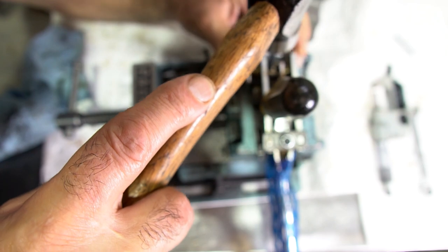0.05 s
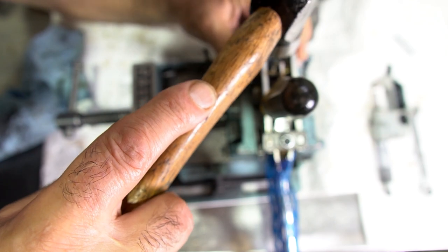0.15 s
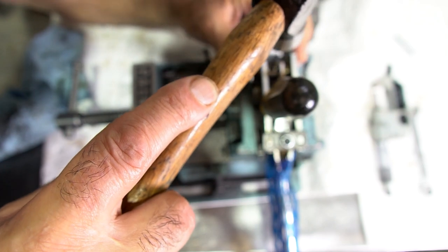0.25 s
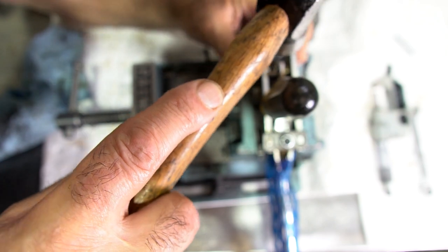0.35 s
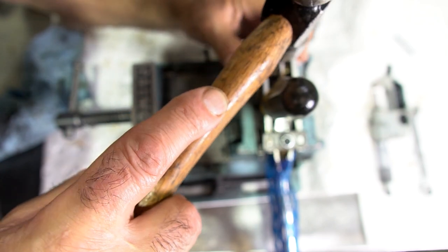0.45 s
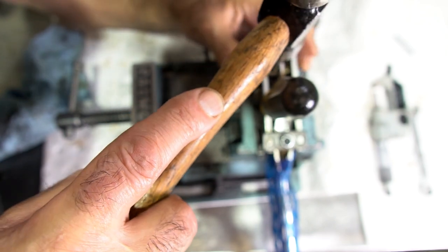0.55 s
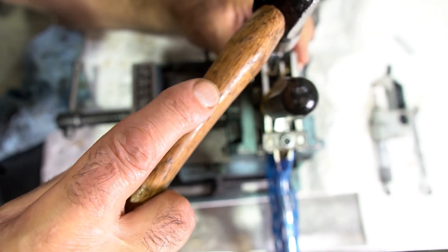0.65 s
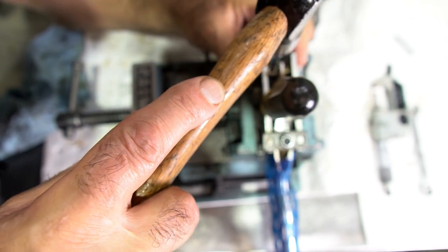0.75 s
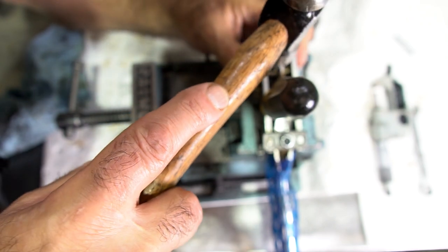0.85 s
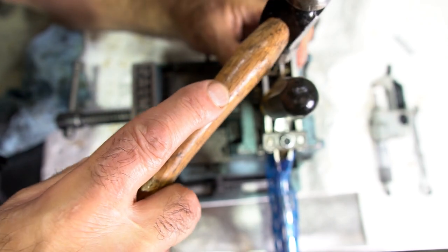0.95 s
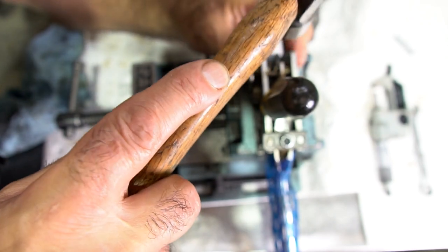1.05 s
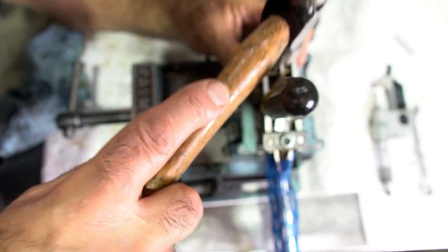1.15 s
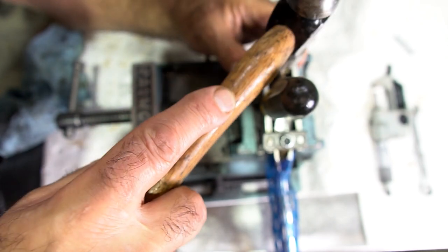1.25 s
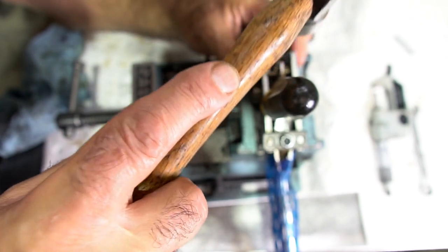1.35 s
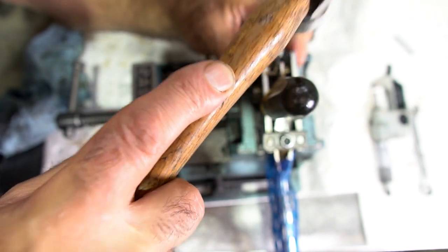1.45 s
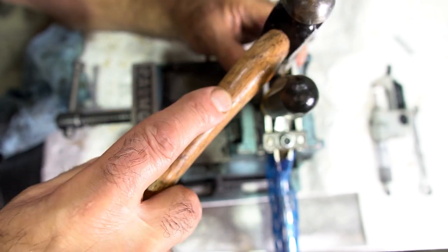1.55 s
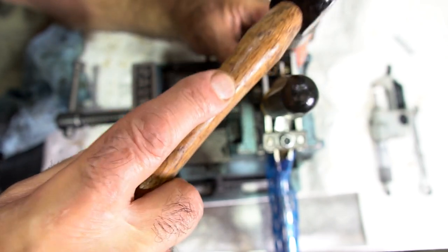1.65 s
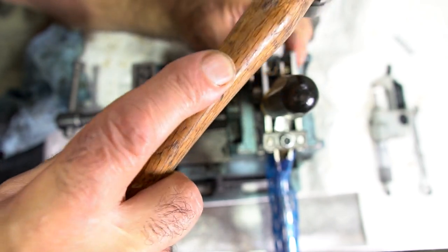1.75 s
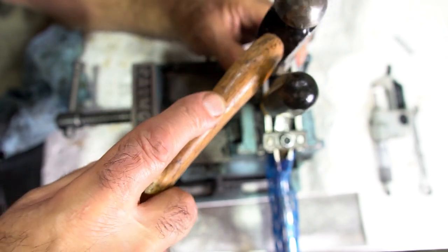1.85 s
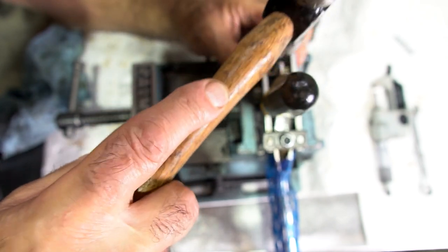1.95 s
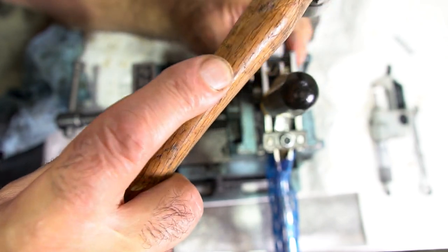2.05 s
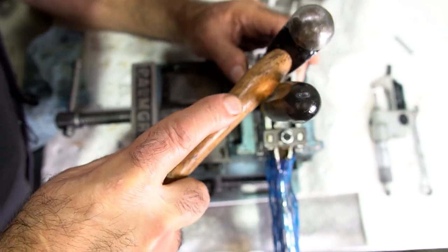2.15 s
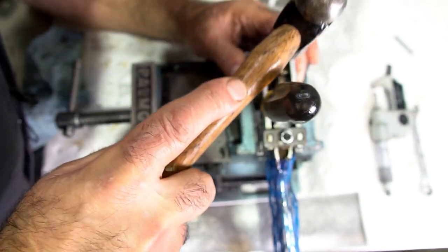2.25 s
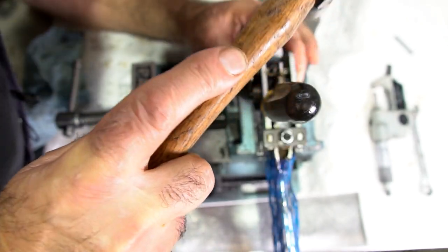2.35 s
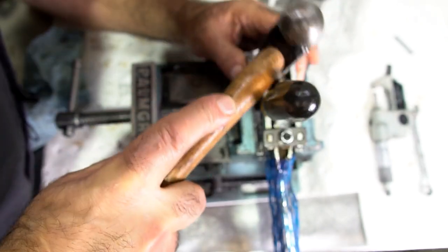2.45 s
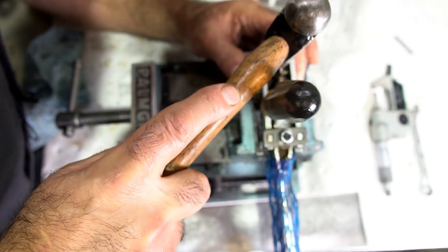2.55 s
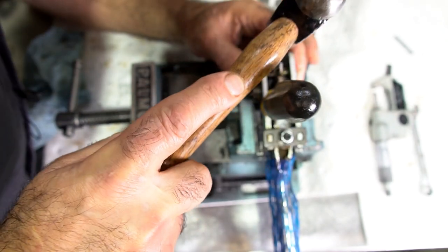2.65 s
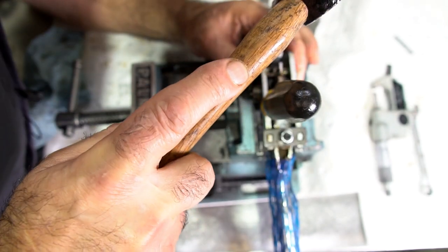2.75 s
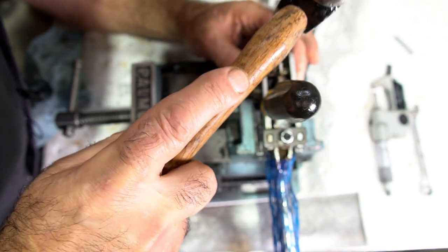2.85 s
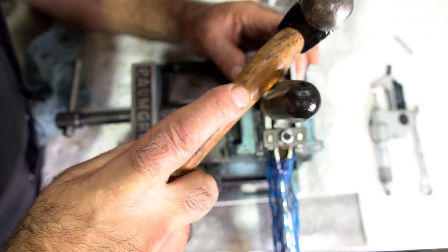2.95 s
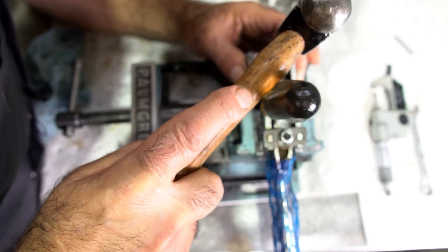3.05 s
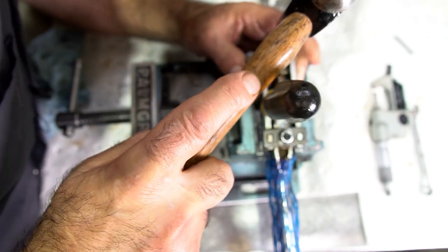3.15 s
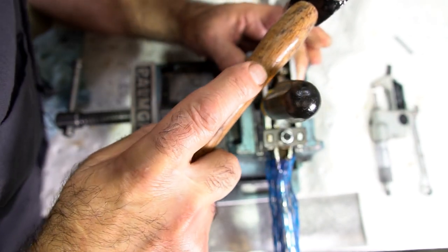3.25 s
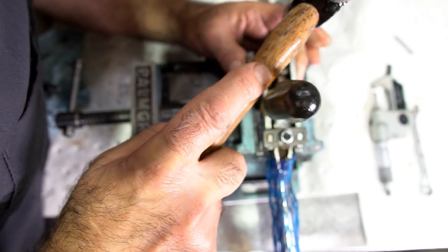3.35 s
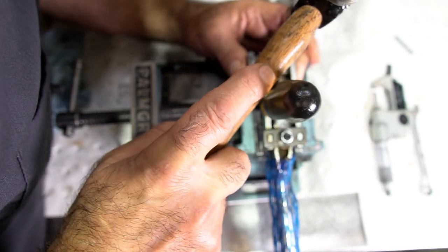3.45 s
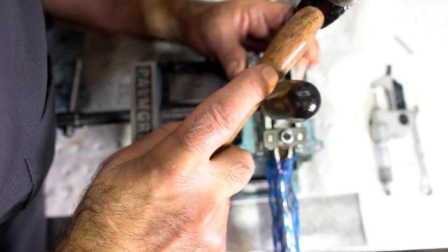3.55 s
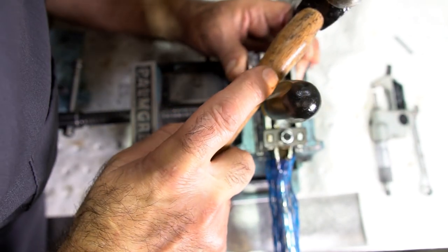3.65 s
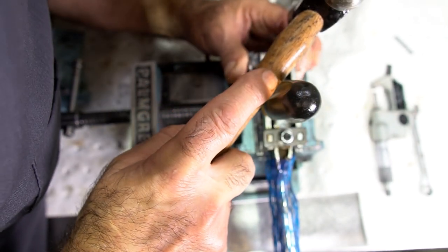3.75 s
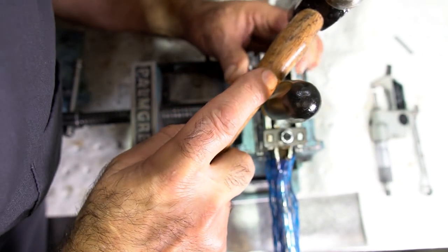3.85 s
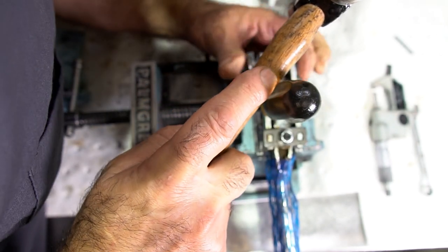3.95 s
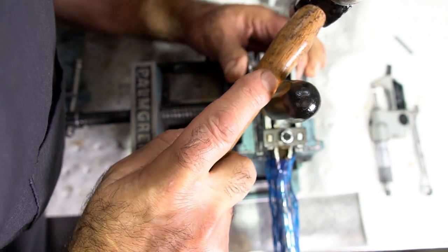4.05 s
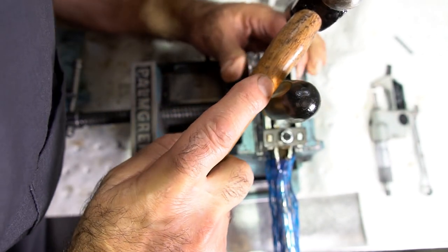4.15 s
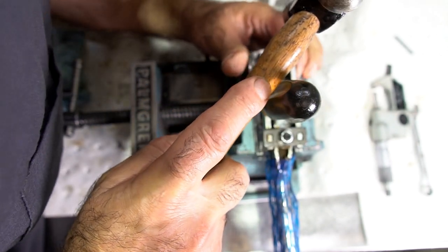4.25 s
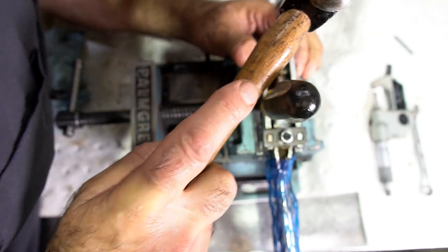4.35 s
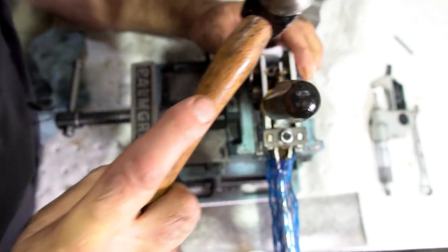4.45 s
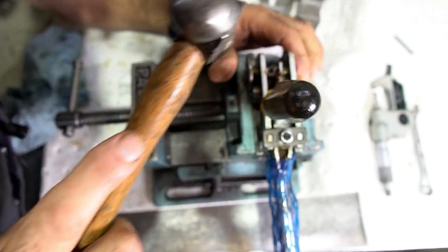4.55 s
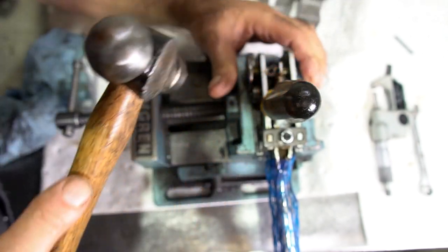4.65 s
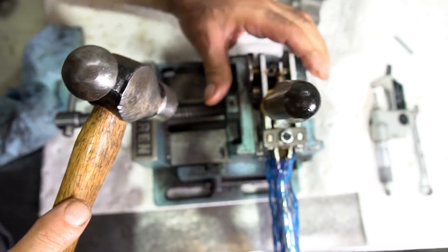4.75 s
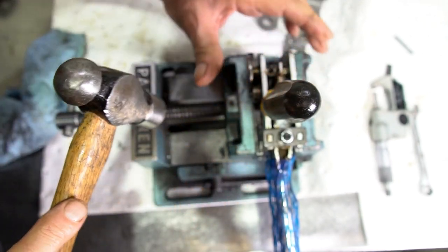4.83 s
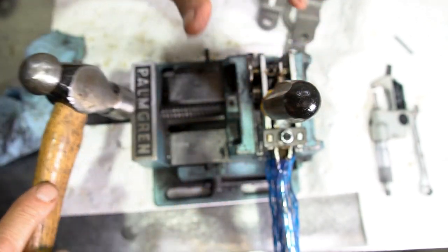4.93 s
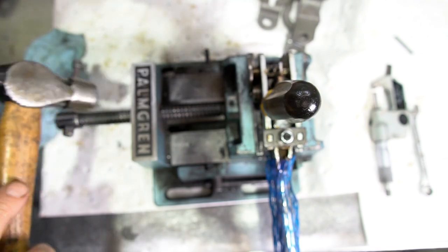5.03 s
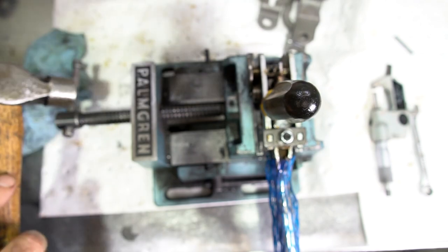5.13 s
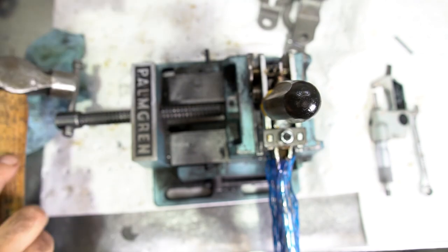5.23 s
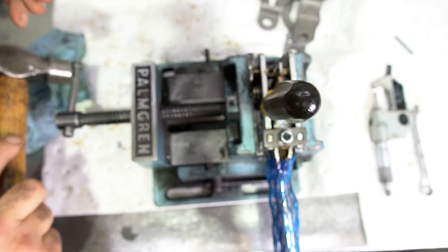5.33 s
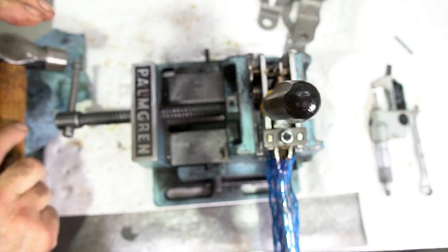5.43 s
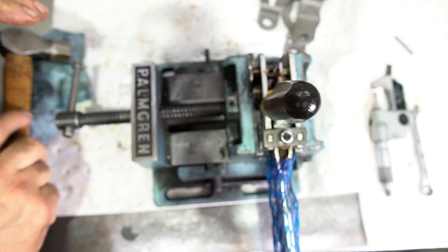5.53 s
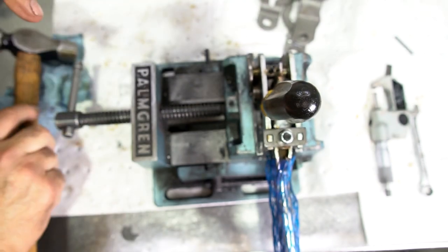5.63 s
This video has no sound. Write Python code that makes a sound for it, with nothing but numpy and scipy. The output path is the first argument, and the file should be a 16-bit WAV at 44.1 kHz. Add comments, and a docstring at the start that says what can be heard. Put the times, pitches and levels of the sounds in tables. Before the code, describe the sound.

A close, dry mono workshop scene lasting about 5.7 seconds, over barely audible air noise and a wavering hum. At the start, the tail of a thud and faint steel ringing die away. A soft knock comes near 0.4, then small dry metal ticks from 0.67 to 1.2. Five very loud hammer blows on a steel punch land at 1.25, 1.58, 1.9, 2.18 and 2.53: sharp cracks, low bench thump and a rattle swelling with each rebound. Later blows are harsher and rattlier, with less deep thump at the end. From 2.95 to about 3.2 a tiny part bounces in a quickening, fading patter. Quiet irregular ticks continue, with low handling rumble and light rustle. Dull knocks cluster from 3.8 to 4.9, a brief gritty scrape comes around 4.4 to 4.55, and a soft hand brush at 4.65. A clear lever clink at 5.33 is followed by a lighter, brighter one at 5.39, then a last tiny tick.

```python
"""Five hammer blows drive a steel punch into a part in a bench vise: each is a burst of shaped noise
for the crack, dying sines for thump, bench and punch, and dying noise and contacts for the rattle.
Metal ticks and a small part's bounces are short struck resonances; dull knocks and lever clinks are
modes with contact noise. The punch scrapes, hands rumble, rustle and brush as noise on level curves;
a piece of steel set down earlier still rings at the start, over air noise and a wavering hum."""
import sys
import numpy as np
from scipy import signal
from scipy.fft import rfft, irfft
from scipy.io import wavfile
from scipy.ndimage import uniform_filter1d

SR = 44100
rng = np.random.default_rng(int(sys.argv[2]) if len(sys.argv) > 2 else 0)


def persist_wave(psi):
    """Save psi, clipped to +-1, as 16-bit WAV."""
    counts = np.round(np.clip(psi, -1, 1) * 32767).astype(np.int16)
    wavfile.write(sys.argv[1], SR, np.atleast_2d(counts).T)


N = 250929

# Noise of steel on steel. Each row: frequency in hertz, relative density in dB per hertz.
CRACK_SPECTRUM = [(290, -25), (500, -2), (1160, -2.5), (2730, -4.5), (3750, -4.5), (5090, -3.5),
                  (6330, -5.5), (7980, -13), (10100, -7), (16000, -21)]
# Noise of rattling loose parts. Each row: frequency in hertz, relative density in dB per hertz.
RATTLE_SPECTRUM = [(240, -34.5), (400, 0), (520, -6), (598, 1), (709, -12.5), (1160, -4.5), (3090, -16),
                   (4550, -16), (8190, -23), (11300, -21.5), (16200, -39.5)]
# Two low bench modes, before each source's own scaling.
# Each row: frequency in hertz, relative level in dB, 60 dB decay time in seconds.
THUMP_MODES = [(68.93, -7, 0.089), (81.5, 3, 0.089)]
USUAL_RATTLE_DB = -33  # reference for all layers that follow the rattle


def amp(db):
    """Level to amplitude ratio: 20 dB is a factor of ten."""
    return 10 ** (np.asarray(db) / 20)


def evened(x):
    """Normalization to unit root mean square."""
    return x / np.sqrt(np.mean(x ** 2) + 1e-20)


def read(points, hz):
    """Interpolation of a curve on a logarithmic frequency axis."""
    f, value = np.transpose(points)
    return np.interp(np.log(hz + 1), np.log(f + 1), value)


def add(mix, s, sound):
    """Superposition: adds a sound to the mix from s seconds on."""
    part = mix[max(round(s * SR), 0):][:len(sound)]
    part += sound[:len(part)]


def noise(spectrum, size):
    """Spectral shaping of white noise, brought to rms 1."""
    hz = np.fft.rfftfreq(size, 1 / SR)
    white = rfft(rng.standard_normal(size))
    return evened(irfft(white * amp(read(spectrum, hz)), size))


def ring(modes, t, longer=1, phase=0):
    """Modal superposition: each mode is a sine that dies exponentially."""
    return sum(amp(db - 60 * t / (t60 * longer)) * np.sin(2 * np.pi * hz * t + phase)
               for hz, db, t60 in modes)


def band(x, lo_hz, hi_hz):
    """Band-pass filtering by a Butterworth resonator."""
    return signal.sosfilt(signal.butter(2, [lo_hz, hi_hz], "band", fs=SR, output="sos"), x)


def dying(x):
    """Frequency-dependent damping: every frequency dies at its own speed."""
    # Each row: frequency in hertz, 60 dB decay time in seconds.
    decay_times = [(50, 0.52), (200, 0.37), (1000, .45), (4000, 0.53), (9000, 0.44), (15000, .25)]
    hz, t, z = signal.stft(x, SR, nperseg=512)
    z = z * amp(-60 * t / read(decay_times, hz)[:, None])
    return signal.istft(z, SR, nperseg=512)[1][:len(x)]


def played(rows, column, spectrum):
    """Amplitude modulation: noise follows one level column of a curve, fading at the ends."""
    s, db = np.transpose(rows)[[0, column]]
    size = round((s[-1] - s[0]) * SR)
    gain = amp(np.interp(s[0] + np.arange(size) / SR, s, db))
    return s[0], gain * noise(spectrum, size) * signal.windows.tukey(size, 900 / size)


def with_rattle(rule, more_db):
    """Level dependence: gain of a layer that follows the rattle."""
    usual_db, gained_per_db = rule
    return amp(usual_db + gained_per_db * more_db)


def blow(crack_db, thump_db, vise_db, sway_db, rattle_db, rebound_s):
    """Impact excitation: a crack of steel, bench and vise modes, and a rattle that swells at the rebound."""
    # Rules of layers: level in dB at the usual rattle, dB gained per dB more rattle.
    treble_rule, shaking_rule, chatter_rule = (0.54, 0.2), (-19, 0.92), (-42, .8)
    lingering_rule = (-54, 1.2)
    lean_rule = (-4.5, .5)  # raises the upper thump mode, divides the lower
    # Modes of vise, swaying bench and bench ring.
    # Each row: frequency in hertz, relative level in dB, 60 dB decay time in seconds.
    vise_modes, sway_modes, bench_ring = [(180.1, -1, 0.12), (289, -2.5, .06), (351, -1.5, .06),
                                          (562, -13, 0.08)], [(37.8, -1.5, 0.64), (95, -12.5, 0.56)], [(154.5, 0.025, 1)]
    t, more_db = np.arange(SR) / SR, rattle_db - USUAL_RATTLE_DB

    burst = noise(CRACK_SPECTRUM, len(t))
    burst += (with_rattle(treble_rule, more_db) - 1) * band(burst, 4800, 16000)
    burst = band(burst, 200, 12500)
    crack_s = 0.0037 * np.exp(-0.0183 * more_db)  # shorter as the rattle grows
    crack_shape = np.exp(-(t / crack_s) ** 2) + .2 * np.exp(-t / .0025)
    crack = burst * (1 - np.exp(-t / .0003)) * crack_shape

    lean = with_rattle(lean_rule, more_db)
    thump = ring(THUMP_MODES[:1], t, phase=-0.93) / lean
    thump += ring(THUMP_MODES[1:], t, phase=-1.8) * lean
    bench = amp(thump_db) * thump
    bench += amp(vise_db) * ring(vise_modes, t, phase=-3.5)  # moves away first
    bench += amp(sway_db) * (ring(sway_modes, t) + amp(-18) * ring(bench_ring, t))

    from_rebound = np.abs(t - rebound_s)
    swell = 1 + amp(-0.1) * np.exp(-from_rebound / np.where(t < rebound_s, .008, .04))
    swell += 1.1 * (t > rebound_s) * np.exp(-from_rebound / .004)  # the hammer lands again
    # many small contacts make the rattle grainy
    grain = amp(2.0 * evened(uniform_filter1d(rng.standard_normal(len(t)), size=120)))
    rattle = amp(rattle_db) * dying(noise(RATTLE_SPECTRUM, len(t)) * grain)
    rattle += with_rattle(chatter_rule, more_db) * chatter(t)
    rattle += with_rattle(lingering_rule, more_db) * linger(t)

    body = bench * (1 - np.exp(-t / 0.001)) + swell * rattle
    body += with_rattle(shaking_rule, more_db) * shake(t)
    return amp(crack_db) * crack + body + punch(t, more_db, rebound_s)


def punch(t, more_db, rebound_s):
    """Contact damping: the punch rings until the rebounding hammer touches it again."""
    # Each row: frequency in hertz, level in dB and 60 dB decay time in seconds at the usual rattle,
    # dB gained per dB more rattle, seconds of decay gained per dB above the usual.
    punch_modes = [(4115, -27, .065, -.15, .03), (5195, -29, .065, -.6, .03), (11040, -38, .11, 1.3, 0),
                   (7340, -75, .055, -5, 0), (8675, -80, .25, -4.5, 0)]
    modes = [(hz, db + rise * more_db, t60 + longer * max(more_db, 0))
             for hz, db, t60, rise, longer in punch_modes]
    return ring(modes, t) * amp(-600 * np.maximum(t - .92 * rebound_s, 0))


def chatter(t):
    """Random impulse excitation: sparse small contacts ring the loose parts, and the whole dies away."""
    # Each row: frequency in hertz, relative level in dB, 60 dB decay time in seconds.
    loose_modes = [(900, -5.5, .15), (1280, 1.5, 0.034), (1393, 2, 0.074), (2085, -1, 0.08),
                   (2820, -3.5, 0.027), (4000, -7.5, 0.019), (6100, -8.5, .015)]
    contacts = rng.random(len(t)) < 900 / SR  # 900 per second on average
    hits = amp(2.8 * np.minimum(rng.exponential(1, len(t)), 4)) * contacts
    which = rng.integers(0, len(loose_modes), len(t))
    rung = sum(signal.oaconvolve(hits * (which == k), ring([mode], t[:6000]))[:len(t)]
               for k, mode in enumerate(loose_modes))
    return evened(rung) * amp(-60 * t / .5)


def linger(t):
    """Resonance under noise excitation: the rattle keeps narrow bands of punch and vise going."""
    # Each row: frequency and width in hertz, relative level in dB, 60 dB decay time in seconds.
    kept_bands = [(6350, 600, -3, .42), (11040, 250, -5, .3)]
    rough = rng.standard_normal(len(t))
    return sum(evened(band(rough, hz - w / 2, hz + w / 2)) * amp(db - 60 * t / t60)
               for hz, w, db, t60 in kept_bands)


def shake(t):
    """Damped random vibration: the bench top wobbles in lumpy low noise."""
    # Each row: frequency in hertz, relative density in dB per hertz.
    shake_spectrum = [(15, -29.5), (25, -9), (75, 0), (140, -1), (227, -6.5), (330, -6.5), (517, -27.5),
                      (900, -20.5), (1170, -52), (1980, -120)]
    return dying(noise(shake_spectrum, len(t))) * (1 - np.exp(-t / .006))


def bounces():
    """Repeated impact: each bounce rings the same short modes; the gaps shrink towards a shortest one."""
    # Modes of the small part, before the scaling of pitch and decay below.
    # Each row: frequency in hertz, relative level in dB, 60 dB decay time in seconds.
    part_modes = [(3070, 0, .01), (4680, -1, .008), (5100, -3, .007), (5650, -7, .006), (6970, -7, .009),
                  (7600, -7, .009), (8800, -11, .009), (9450, -10, .008), (11500, -13, .003)]
    # Starts of the slow hops in seconds.
    slow = [2.9541, 2.9767, 2.9996, 3.0231, 3.044, 3.062, 3.08, 3.095, 3.11, 3.124]
    first_gap_s, last_gap_s, gap_kept = .0115, .0042, .72
    out, t, k = np.zeros(N), np.arange(600) / SR, np.arange(14)
    quick = slow[-1] + np.cumsum(last_gap_s + (first_gap_s - last_gap_s) * gap_kept ** k)
    fades_db = [0] * len(slow) + [*(-0.83 * (k + 1))]  # only the quick hops get fainter
    for s, db in zip([*slow, *quick], fades_db):
        hop = ring(part_modes, t * rng.uniform(.99, 1.01), .85) * (1 - np.exp(-t / .0005))
        add(out, s, amp(-39 + db + rng.normal(0, .8)) * hop)
    return out


def tick(db, treble_db):
    """Struck resonance: a dry snap and a smaller second contact excite bands that vary every time."""
    # Each row: frequency and half-width in hertz, relative level in dB, before the random spread.
    resonances = [(1320, 620, -2), (2780, 360, 0.5), (3420, 250, -6.5), (5120, 450, 0.5), (5700, 430, 0.5),
                  (7150, 400, -7.5)]
    treble_from_hz = 4500
    t = np.arange(900) / SR
    again = t - rng.uniform(.002, .006)
    shape = np.exp(-t / 0.0016)
    shape += rng.uniform(0, 0.34) * (again > 0) * np.exp(-abs(again) / 0.00087)
    spit = .2 * rng.standard_normal(len(t)) * shape + (t == 0)  # noise and one impulse
    chance = rng.standard_normal((len(resonances), 2))
    low, high = band(spit, 1100, treble_from_hz), band(spit, treble_from_hz, 9400)
    for (hz, w, top_db), (a, b) in zip(resonances, chance):
        lo_hz, hi_hz = hz * (1 + 0.042 * b) - w, hz * (1 + 0.057 * b) + w
        rung = amp(top_db + 3.8 * a) * np.sqrt(4000 / w) * band(spit, lo_hz, hi_hz)
        if hz > treble_from_hz:
            high = high + rung
        else:
            low = low + rung
    return amp(db) * (low / abs(low).max() + amp(treble_db) * high / abs(high).max())


def knock(db, hz, bass_db):
    """Heavily damped impact: a dull tap and a push of the bench."""
    t = np.arange(4000) / SR
    contact = band(rng.standard_normal(len(t)), 136, 1100) * 3.33 * np.exp(-t / 0.01)
    tap = ring([(hz, 0, .04), (1300, -6, .03)], t) + contact
    return amp(db) * tap - amp(bass_db) * ring(THUMP_MODES, t, 0.28)


def clink(low_db, high_db, longer, thump_db, shake_db):
    """Modal ringing of a struck bar: the lever's modes, a spit of contact noise, a thump and a shake."""
    # Modes of the lever, decay before the factor "longer".
    # Each row: frequency in hertz, relative level in dB, 60 dB decay time in seconds.
    low_modes, high_modes = [(437, -8, 0.37), (990, 4.5, 0.11), (1080, 1.5, 0.1), (1200, -6.5, 0.25),
                             (2016, -6.5, 0.14), (2340, 5, 0.084)], [(2304, -15, .2), (3380, -16, .1), (4200, 3, .035),
                                                (4230, -24, .25), (5190, -3, .06), (5230, -17, .22),
                                                (6013, -8, .03), (11190, -13, .06)]
    t = np.arange(round(.5 * SR)) / SR
    modes = amp(low_db) * ring(low_modes, t, longer) + amp(high_db) * ring(high_modes, t, longer)
    contact = band(noise(CRACK_SPECTRUM, len(t)), 596, 9300) * np.exp(-t / 0.003)
    spit = (amp(low_db) + amp(high_db)) * 0.68 * contact
    tail = amp(shake_db) * (shake(t) + 0.28 * dying(noise(RATTLE_SPECTRUM, len(t))))
    return (modes + spit) * (1 - np.exp(-t / 0.00049)) + amp(thump_db) * ring(THUMP_MODES, t) + tail


def scrape():
    """Friction excitation: uneven gritty slips rub the punch's resonances, with a high hiss."""
    # The punch is dragged clear. Each row: time in seconds, ringing and hiss levels in dB before the grit.
    drag = [(4.39, -65, -94), (4.43, -53, -76), (4.49, -47, -60), (4.505, -49, -67), (4.515, -62, -72),
            (4.53, -55, -76), (4.553, -50.5, -55), (4.562, -72, -74)]
    # Each row: frequency and width in hertz, relative level in dB.
    resonances = [(1250, 300, -14), (1900, 200, -8), (2180, 120, -2), (3270, 70, 2), (4400, 1000, -22),
                  (6050, 90, -8)]
    hz = np.geomspace(500, 9000, 300)
    tops = sum(amp(db) / np.hypot(1, 2 * (hz - f) / w) for f, w, db in resonances)
    s, rub = played(drag, column=1, spectrum=np.transpose([hz, 20 * np.log10(tops)]))
    hiss_spectrum = [(3000, -30), (5000, -15), (9000, 4), (12000, 11.5), (15000, -16)]
    hiss = played(drag, column=2, spectrum=hiss_spectrum)[1]
    slips, grit = (evened(uniform_filter1d(rng.standard_normal(len(rub)), size=size))
                   for size in (300, 40))
    return s, amp(3 * slips + grit - 1) * rub + amp(2.5 * grit - 1) * hiss


def handling(rows):
    """Broadband friction and structure-borne noise: shifting hands rustle and rumble on the bench."""
    # Each row: frequency in hertz, relative density in dB per hertz.
    rumble_spectrum, rustle_spectrum = [(12, -13), (20, 9), (38, -1.5), (115, -3), (254, -16), (308, -9.5),
                                        (450, -21), (580, -23), (990, -120)], [(200, -34), (400, 0.5), (900, -1.5), (1800, -7.5),
                                                        (4000, -20.5)]
    s, rumble = played(rows, column=1, spectrum=rumble_spectrum)
    rustle = played(rows, column=2, spectrum=rustle_spectrum)[1]
    return s, rumble + rustle


def brush():
    """Soft friction: a brush of the hand is mid-band noise that rises and falls."""
    # Each row: time in seconds, level in dB.
    stroke = [(4.63, -69), (4.67, -62), (4.72, -73)]
    return played(stroke, column=1, spectrum=[(500, -14.5), (1000, -2), (3500, -5), (5500, -14.5)])


def set_down():
    """Free decay: steel set down just before the start leaves the last of a thud and its ringing."""
    # Each row: frequency in hertz, level in dB, 60 dB decay time in seconds.
    steel_modes = [(375.6, -41, 0.25), (504, -41, 0.093), (718, -35, 0.076), (867, -53, 0.11),
                   (3410, -62.5, 0.27), (4237, -54.5, 0.27), (4974, -65, .35), (5200, -69.5, 1),
                   (10280, -71, .2)]
    # Each row: frequency in hertz, relative density in dB per hertz.
    thud_spectrum = [(40, -21), (110, 5.5), (320, 2.5), (700, -9), (1500, -20.5), (3000, -29), (6000, -46)]
    t = np.arange(SR) / SR
    two_decays = amp(-39 - 60 * t / 0.13) + amp(-43.5 - 60 * t / 0.38)
    return noise(thud_spectrum, SR) * two_decays + ring(steel_modes, t)


def workshop():
    """Stationary background: shaped air noise and steady tones with randomly wavering amplitude."""
    # Each row: frequency in hertz, relative density in dB per hertz.
    air_spectrum = [(12, -29), (20, -4), (86, -4), (193, -20), (412, -14.5), (474, -21.5), (645, -32.5),
                    (1070, -25.5), (1410, -26), (1540, -27), (2770, -31), (13700, -38.5), (16200, -44)]
    # Mains-driven gear. Each row: frequency in hertz, peak amplitude in dB before the wavering.
    hum_tones = [(123.8, -74.5), (333.8, -72.5), (479.1, -73.5), (721.4, -82), (839.8, -81.5),
                 (1077, -85.5)]
    t = np.arange(N) / SR
    hum = np.zeros(N)
    for hz, db in hum_tones:
        waver_db = 3.9 * evened(uniform_filter1d(rng.standard_normal(N), size=5000))
        hum += amp(db + waver_db) * np.sin(2 * np.pi * (hz * t + rng.random()))
    return amp(-62) * noise(air_spectrum, N) + hum


def scene():
    """Linear superposition of all sources at their times."""
    # Each row: start in seconds, levels of crack, deep thump, vise knock, bench sway and rattle in dB,
    # rebound delay in seconds.
    blows = [(1.2494, -9.5, -10, -18.5, -22, -42.5, 0.038), (1.5798, -6.5, -5.5, -11, -16.5, -35.5, 0.032),
             (1.9012, -4, -6, -12.5, -17, -32, 0.054), (2.1814, -2, -9.5, -5, -26, -25.5, .044),
             (2.5293, -2.5, -17.5, -9, -25, -23, .054)]
    # Metal ticks. Each row: start in seconds, level in dB, relative treble level in dB.
    ticks = [(0.6672, -58.5, 1), (0.7003, -53.5, -1), (0.7294, -49, -2), (0.7623, -46.5, -6),
             (0.7903, -46.5, -5), (0.8136, -48, -6), (0.837, -48, -5), (0.8654, -45, -2.5),
             (0.8952, -44, -7), (0.9353, -47.5, -6), (1.065, -40, -8.5), (1.0891, -43, -3),
             (1.1074, -53, -5), (1.1405, -50, 3.5), (1.152, -54, -8), (1.1839, -45, -1), (1.213, -46.5, -5),
             (1.4167, -44.5, -5), (1.4954, -54.5, 1), (1.503, -45, -5), (1.776, -51, 1),
             (1.7934, -47.5, -2), (2.1321, -52, -5), (3.0124, -47, -2), (3.2322, -50.5, -5),
             (3.257, -55, -5), (3.2849, -46, -5), (3.2944, -52, -5), (3.307, -51, -3), (3.3233, -50.5, 0),
             (3.3354, -56, -5), (3.355, -54, -5), (3.3688, -47, -3), (3.3774, -58, -1), (3.394, -49, -4),
             (3.4151, -53.5, -1), (3.4296, -52, -1), (3.4535, -59, -5), (3.474, -53.5, -4), (3.53, -54, -7),
             (3.5519, -43, -8.5), (3.5753, -54, -9), (3.601, -48, -7), (3.7327, -47, -2),
             (3.7578, -44.5, -5), (3.7804, -59, 3.5), (3.8555, -53, -5), (3.93, -37, -2.5),
             (3.9514, -42.5, -3), (4.0278, -45, -5), (4.0323, -44, -4), (4.0608, -46, -5),
             (4.0899, -47.5, -4), (4.118, -47.5, -9), (4.1484, -46, -7.5), (4.1746, -47, -9),
             (4.2225, -48.5, -10), (4.2736, -47, -8), (4.3197, -44.5, -10), (4.336, -48, -10),
             (4.3488, -55, -5), (4.382, -46.5, -9), (4.401, -46, -6), (4.4119, -45, -5), (4.548, -50, -5),
             (4.5757, -50, -2), (4.5915, -48, 1), (4.8233, -49, -4), (5.0012, -56.5, 4), (5.3464, -41, -5),
             (5.5922, -42, 6)]
    # Hand and tool on the vise. Each row: start in seconds, level in dB, pitch in hertz, bass level in dB.
    knocks = [(0.383, -50, 320, -72), (3.813, -52, 330, -42), (3.895, -52.5, 343, -38.5),
              (3.931, -40.5, 292, -34.5), (4.018, -61, 466, -35), (4.054, -46.5, 360, -39),
              (4.16, -40, 346, -72), (4.357, -46, 316, -60), (4.548, -42.5, 630, -35.5),
              (4.593, -54, 1450, -34), (4.779, -54.5, 301, -37.5), (4.892, -53.5, 723, -45)]
    # Vise lever. Each row: start in seconds, low-mode and high-mode levels in dB,
    # ring length as a factor, thump and shake levels in dB.
    clinks = [(5.3319, -28.5, -28.5, 0.44, -30.5, -39), (5.386, -42, -28, 0.53, -40.5, -52.5)]
    # Hands on the bench, one curve per spell. Each row: time in seconds, rumble and rustle levels in dB.
    spells = [
        [(0.1, -79, -75), (0.97, -91, -76), (1.24, -76, -81)],
        [(2.8, -49.5, -68.5), (3.51, -60.5, -75.5), (4.43, -45, -61.5), (4.89, -60.5, -70.5),
         (5.69, -57, -63.5)],
    ]
    mix = workshop() + bounces()
    add(mix, 0, set_down())
    for source, table in (blow, blows), (tick, ticks), (knock, knocks), (clink, clinks):
        for s, *row in table:
            add(mix, s, source(*row))
    for rows in spells:
        add(mix, *handling(rows))
    add(mix, *scrape())
    add(mix, *brush())
    return mix[None]


def record(dry):
    """Input-stage limits: high-pass coupling blocks the lowest bass, peaks clip, then the band is limited."""
    coupled = signal.sosfilt(signal.butter(2, 18, "high", fs=SR, output="sos"), dry)
    clipped = np.clip(coupled, -.98, .98)
    low_pass = signal.firwin(255, 16200, window=("kaiser", 6), fs=SR)
    return signal.oaconvolve(clipped, low_pass[None], "same")


dry = scene()
out = record(dry)
persist_wave(out)
```